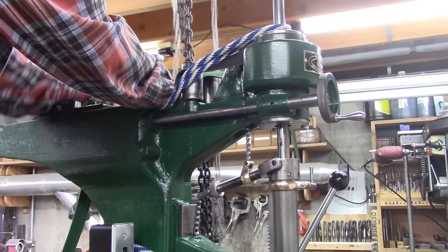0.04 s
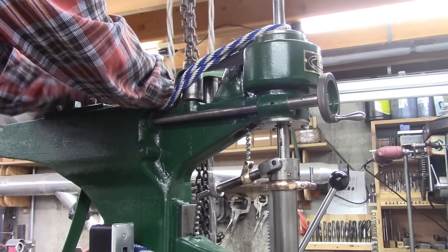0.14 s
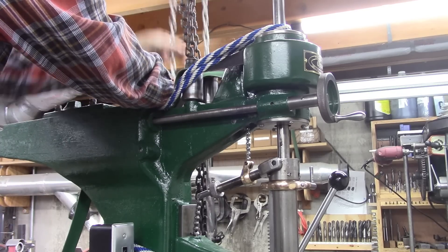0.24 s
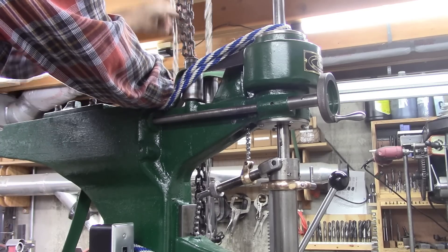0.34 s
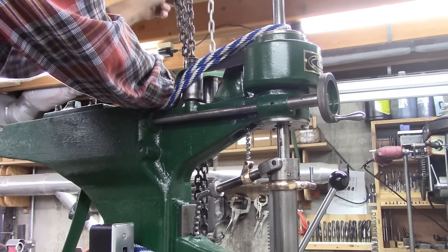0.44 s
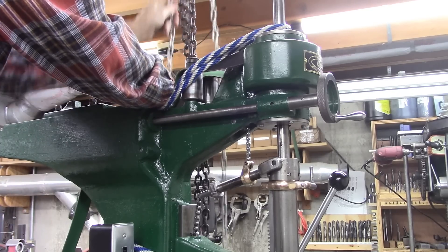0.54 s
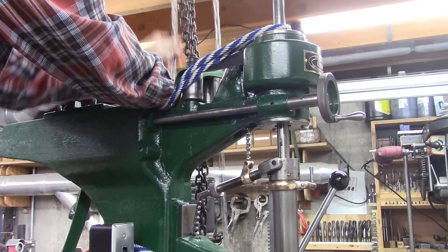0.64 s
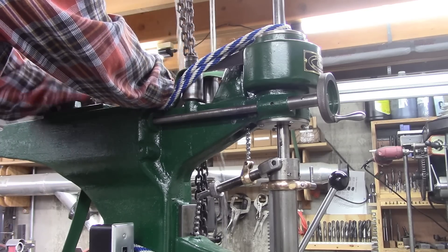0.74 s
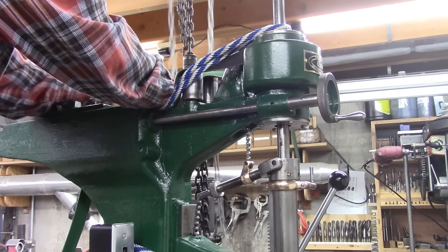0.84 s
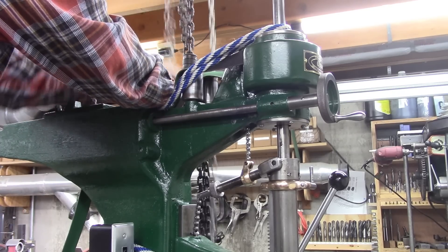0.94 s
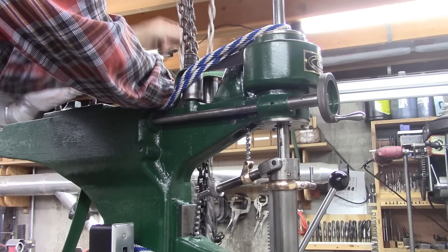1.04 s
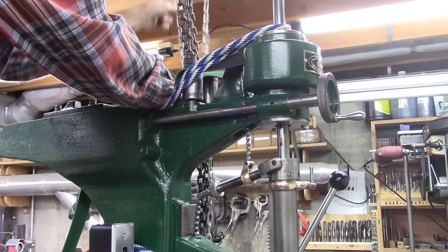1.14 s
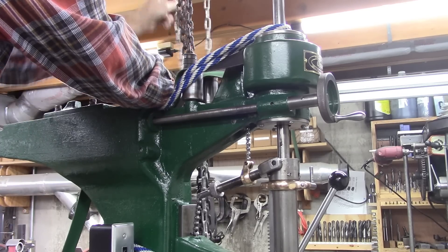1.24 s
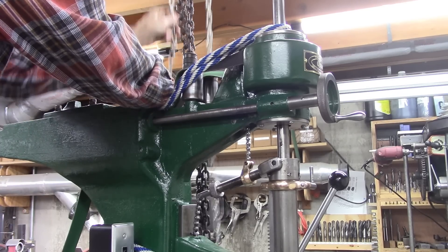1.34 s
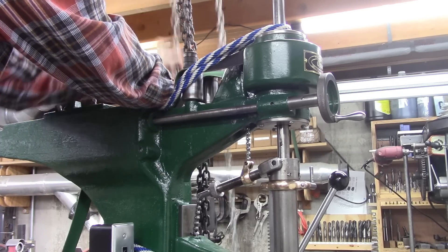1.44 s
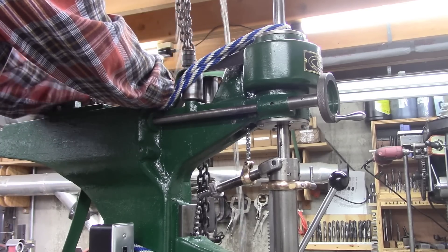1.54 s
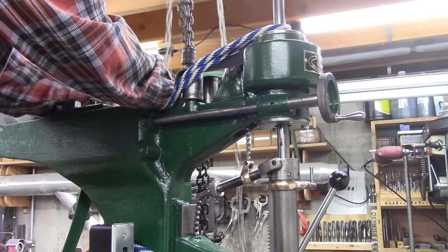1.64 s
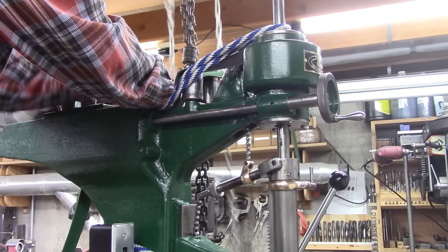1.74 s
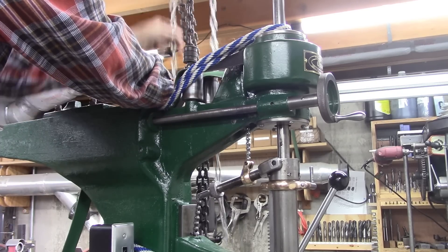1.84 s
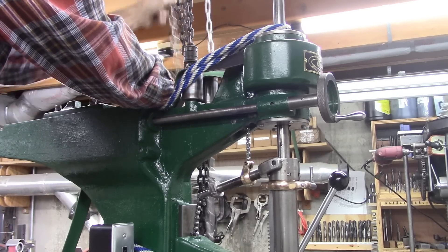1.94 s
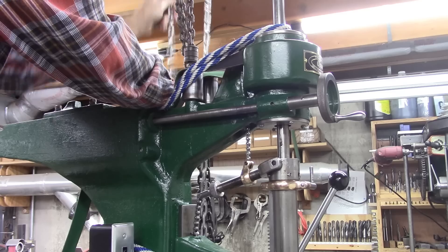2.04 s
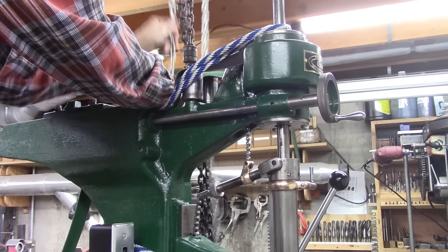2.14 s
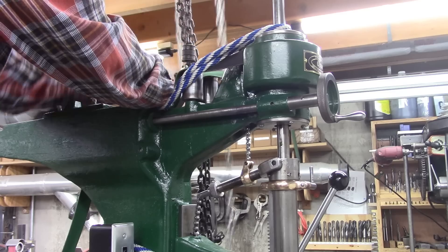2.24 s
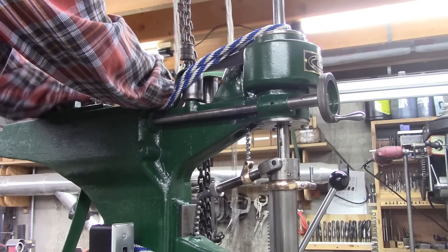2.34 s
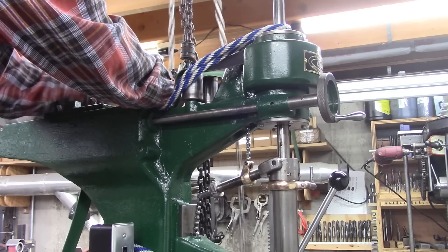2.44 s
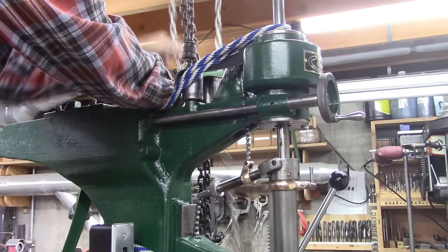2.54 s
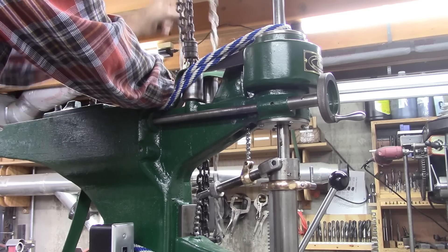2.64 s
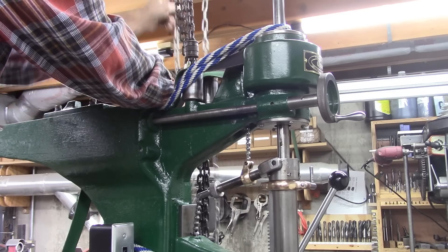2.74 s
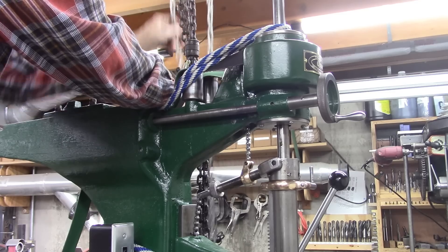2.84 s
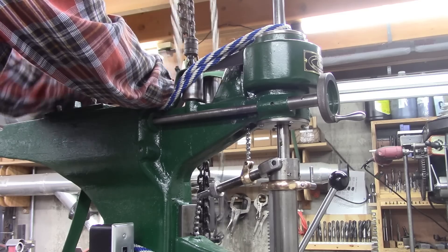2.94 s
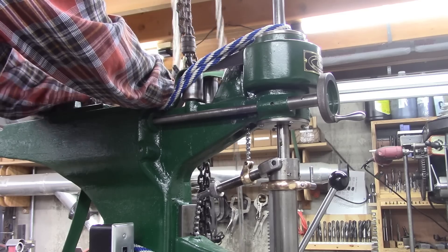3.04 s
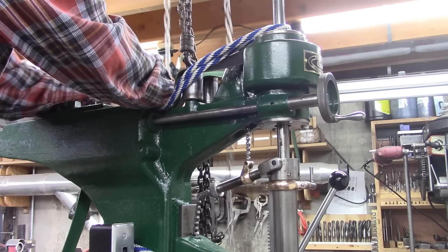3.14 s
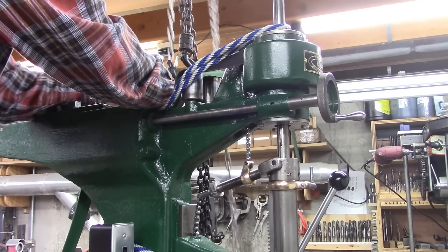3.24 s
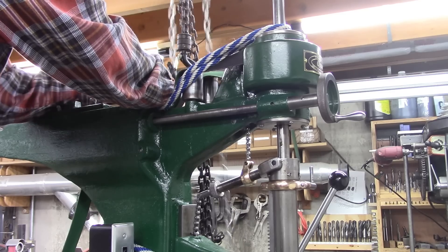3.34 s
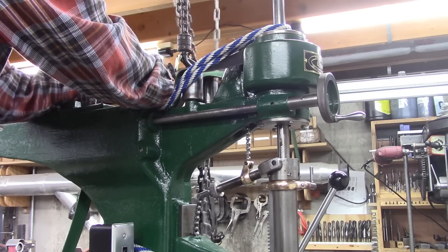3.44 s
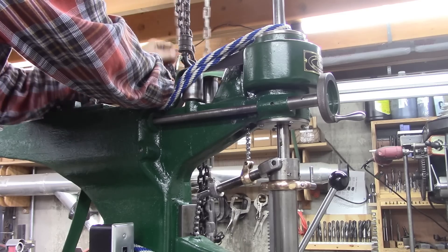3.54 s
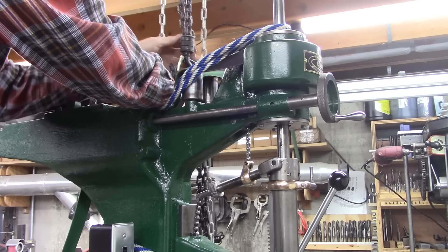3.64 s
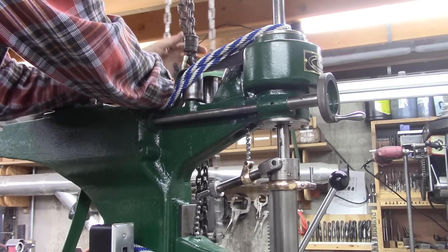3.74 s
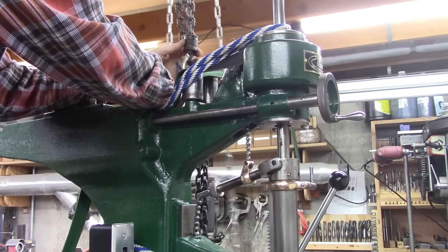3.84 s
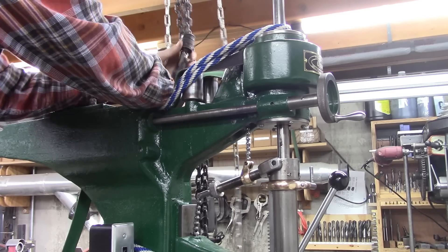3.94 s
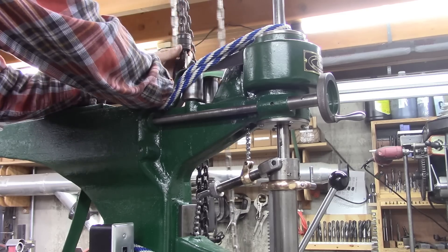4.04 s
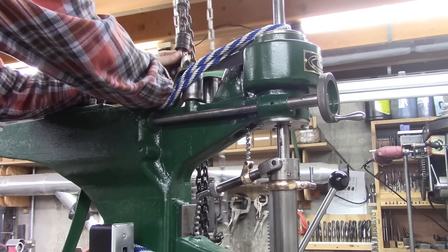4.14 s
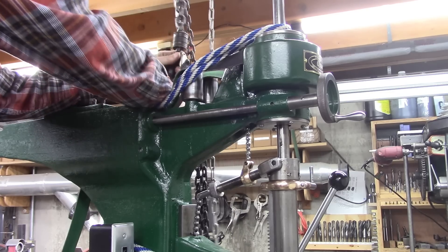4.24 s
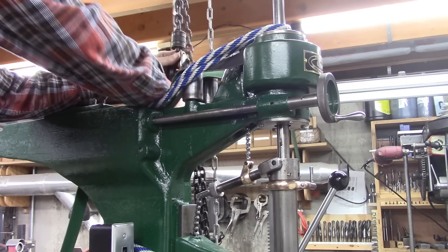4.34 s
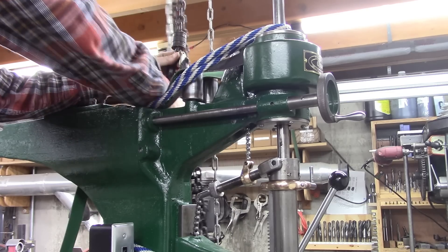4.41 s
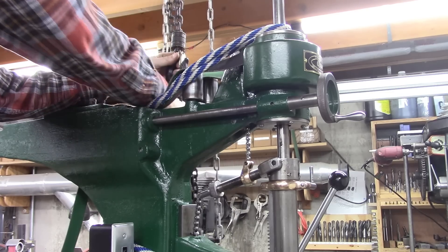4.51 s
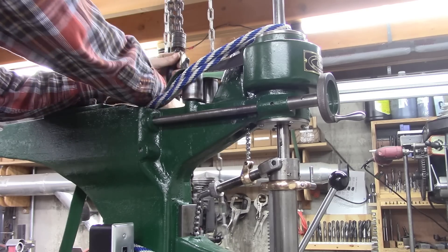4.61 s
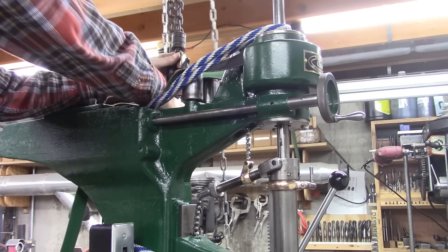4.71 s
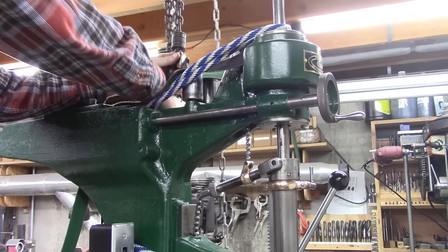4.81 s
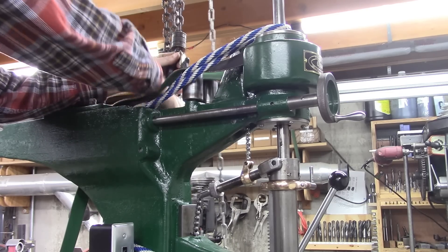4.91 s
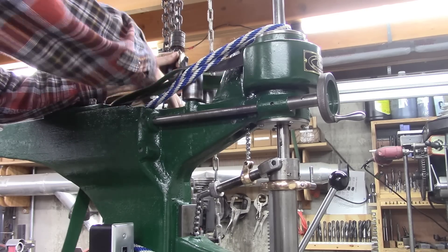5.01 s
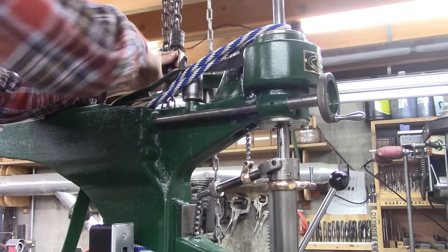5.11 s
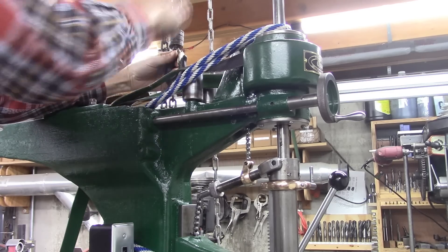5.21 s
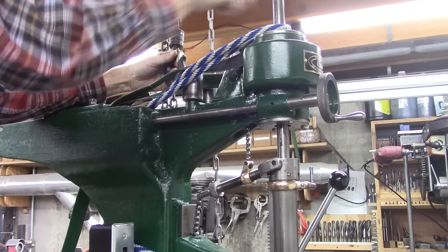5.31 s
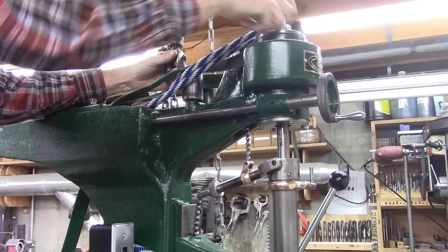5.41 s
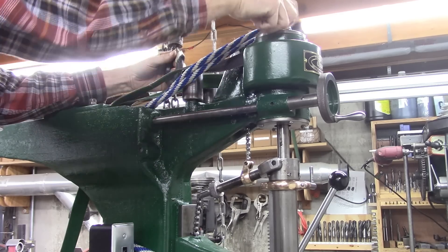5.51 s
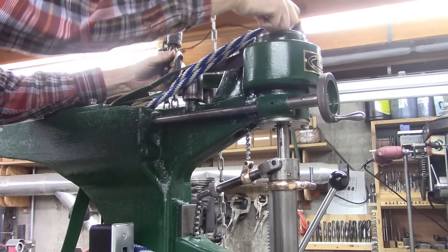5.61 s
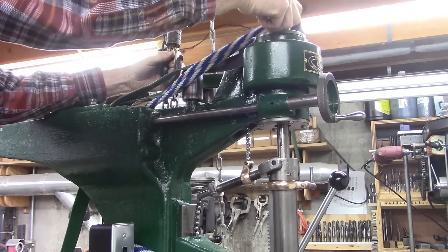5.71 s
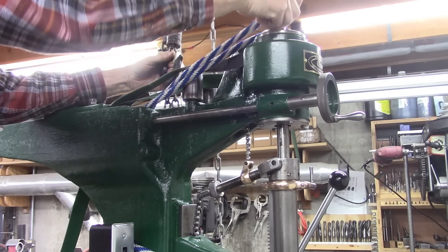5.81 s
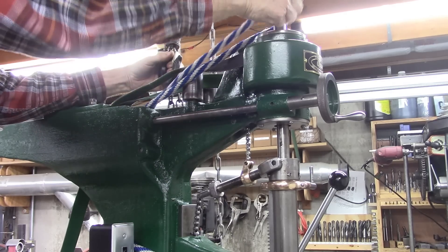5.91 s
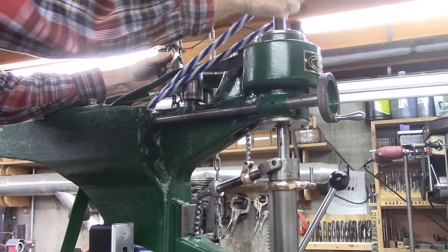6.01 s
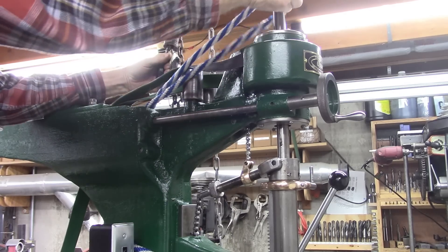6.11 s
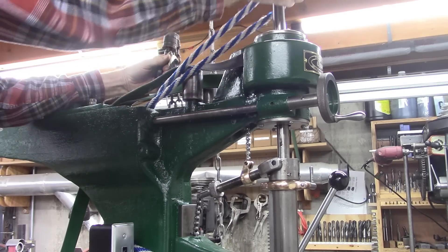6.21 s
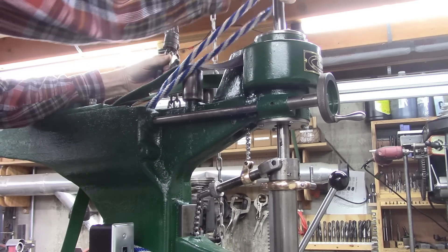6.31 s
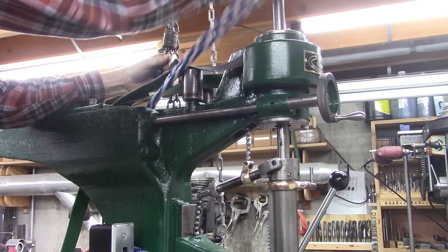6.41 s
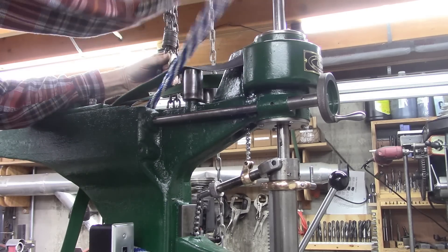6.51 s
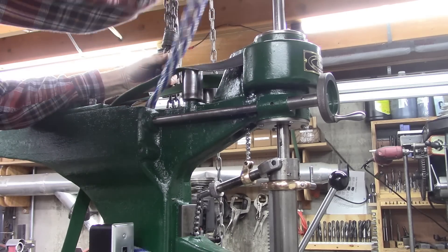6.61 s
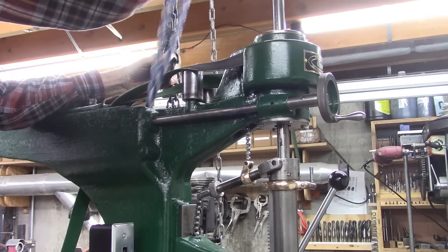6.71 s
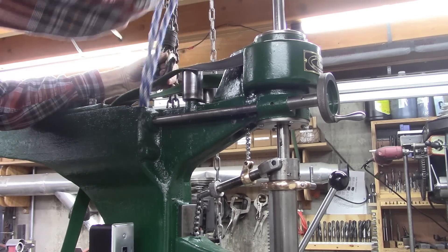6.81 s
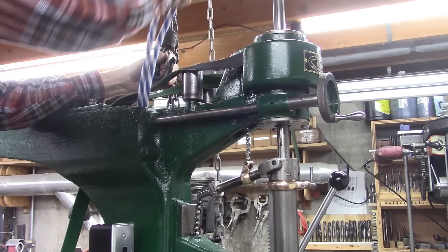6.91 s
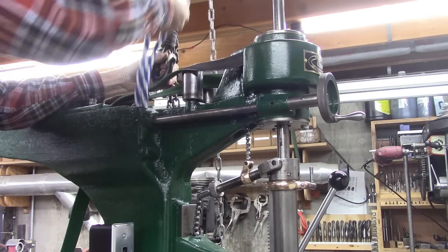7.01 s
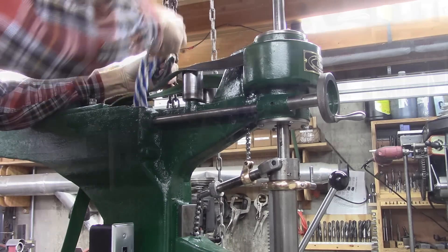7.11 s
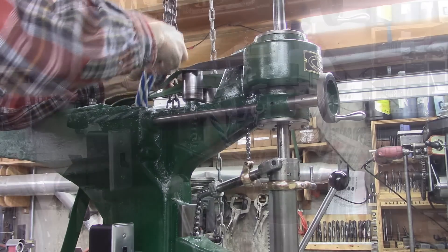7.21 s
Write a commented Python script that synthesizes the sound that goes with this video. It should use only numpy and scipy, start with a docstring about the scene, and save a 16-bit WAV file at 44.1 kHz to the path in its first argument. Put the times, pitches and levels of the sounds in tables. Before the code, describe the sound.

Five brisk bursts of sharp pawl clicking with chain clinking and hollow wheel clanks, nearly back to back, loud and near. A beam shudders low beneath them. Then comes much quieter handling of a heavy slung machine: dull and metallic knocks, tiny high squeaks, sleeves and rope sliding. Short workshop echoes and a faint hum surround everything, and a blurred ratchet rattle rises just before the cut.

```python
"""A fast steel rattle runs down at once: a hand chain hoist is hauled in five pulls, close to the microphone.
The pawl snaps at every tooth, every few teeth a chain link knocks into the wheel and jingles, the chain ticks
through its guide, and now and then the housing booms and the beam shudders.
Then the slung machine is handled with small knocks, squeaks and rubbing, and the rattle swells again at the end.
Filtered noise bursts make the impacts, decaying sines the rings; the workshop adds echoes, air and faint hum."""
import sys
import numpy as np
from scipy import signal
from scipy.io import wavfile
from scipy.ndimage import uniform_filter1d, minimum_filter1d

SR = 44100
rng = np.random.default_rng(int(sys.argv[2]) if len(sys.argv) > 2 else 0)


def store_wav(level_fs):
    """Save 16-bit WAV to argv[1]."""
    pcm = np.round(np.clip(np.atleast_2d(level_fs), -1, 1) * 32767)
    wavfile.write(sys.argv[1], SR, pcm.T.astype(np.int16))


N = 320166
TIME = np.arange(N) / SR  # s

# speed of the ratchet wheel, one curve per pull; the last is the closing rattle: time_s, speed_teeth_per_s
PULLS = [
    [(0.002, 86.7), (0.07, 69.4), (0.153, 54.0), (0.203, 54.6), (0.323, 37.8), (0.35, 27.3), (0.398, 25.6),
     (0.462, 14.6)],
    [(0.556, 18.8), (0.724, 74.1), (0.786, 79.8), (0.96, 44.0), (1.006, 45.0), (1.043, 35.0), (1.105, 27.2),
     (1.184, 4.4)],
    [(1.338, 18.1), (1.48, 58.9), (1.582, 76.5), (1.708, 49.4), (1.747, 49.5), (1.881, 29.4), (1.924, 27.2),
     (1.996, 10.2)],
    [(2.07, 8.1), (2.139, 28.5), (2.194, 55.9), (2.356, 77.8), (2.492, 45.6), (2.549, 51.2), (2.585, 38.3),
     (2.754, 20.9)],
    [(2.808, 16.7), (3.009, 70.9), (3.089, 67.1), (3.171, 44.9), (3.222, 44.8), (3.31, 25.6), (3.364, 27.0),
     (3.431, 15.1)],
    [(7.128, 37), (7.27, 45)],
]
# ring of the chain wheel and its steel cover: pitch_hz, relative_level_db, t60_s
WHEEL_MODES = [(407, -21, .12), (530, -3.5, .04), (590, -2, .04), (738, -2, .07), (779, 1, .08),
               (893, 0, .07), (983, -5, .07), (1090, -11, .06), (1352, -5.5, .085), (1425, -11, .1)]
# sleeves and rope rub over the casting: time_s, level_db
RUBBING = [(3.3, -52), (3.9, -46.5), (4.2, -46), (4.6, -50.5), (5, -52), (5.3, -53), (5.7, -59),
           (6.25, -57.5), (6.43, -50), (6.55, -58), (7, -58), (7.2, -50)]


def amp(db):
    """Decibels to gain."""
    return 10 ** (np.asarray(db) / 20)


def unit(x):
    """Scales to rms 1."""
    return x / np.sqrt(np.mean(x ** 2) + 1e-20)


def read(points, hz):
    """Reads a table on a log-frequency axis."""
    f, value = np.transpose(points)
    return np.interp(np.log(hz + 1), np.log(f + 1), value)


def level(curve):
    """Gain over time from rows of time_s, level_db."""
    return amp(np.interp(TIME, *np.transpose(curve)))


def add(mix, s, sound):
    """Mixes a sound in at time s."""
    part = mix[max(round(s * SR), 0):][:len(sound)]
    part += sound[:len(part)]


def colour(x, points, size=4096):
    """Causal filter with the given spectrum; white noise keeps its power."""
    gain = unit(amp(read(points, abs(np.fft.fftfreq(size, 1 / SR)))))
    # minimum phase puts the energy of the taps at their start
    minimum_phase = np.exp(np.conj(signal.hilbert(np.log(gain))))
    taps = np.fft.ifft(minimum_phase).real
    return signal.oaconvolve(x, taps[:size // 2])[:len(x)]


def chatter(hold, fade):
    """Steel bouncing on steel: a dense noise burst that holds briefly, then dies (both in s)."""
    t = TIME[:SR // 4]
    return rng.standard_normal(len(t)) * np.exp(-np.maximum(t - hold, 0) / fade)


def ring(modes, scatter_db, detune, life=1):
    """One blow on a set of modes, each blow on a different spot; life scales the decay times."""
    hz, db, t60 = np.transpose(modes)[:, :, None]
    t = TIME[:int(SR // 4 * min(life, 1))]
    size = amp(db + scatter_db * rng.standard_normal(hz.shape))
    turns = hz * (1 + detune * rng.standard_normal(hz.shape)) * t + rng.random(hz.shape)
    tones = np.sin((2 * np.pi * turns).astype(np.float32))
    decay = np.exp((-np.log(1000) * t / (life * t60)).astype(np.float32))
    return (size * tones * decay).sum(0) / np.sqrt(np.sum(size ** 2) / 2)


def wavering(hz, width_hz):
    """A tone whose pitch and strength wander at random."""
    f = np.fft.fftfreq(N, 1 / SR)
    band = 1 / (1 + ((f - hz) / width_hz) ** 4)
    z = np.fft.ifft(np.fft.fft(rng.standard_normal(N)) * band)
    return unit(z.real / abs(z) ** .8)  # most of the strength's wandering is evened out


def passings(first_teeth, spacing):
    """Rows (s, teeth per s): the moments at which the wheel has turned on by another `spacing` teeth."""
    rows = []
    for pull, first in zip(PULLS, first_teeth):
        times, speeds = np.transpose(pull)
        t = np.arange(times[0], times[-1], 1 / SR)
        speed = np.interp(t, times, speeds)
        turned = np.cumsum(speed) / SR  # teeth
        at = np.searchsorted(turned, np.arange(first, turned[-1], spacing))
        rows += zip(t[at], speed[at])
    return rows


def pawl_drops(still_db=-4.5, softer_db_per_tooth_per_s=.05, scatter_db=0.64):
    """Rows (s, dB): the pawl drops once a tooth; a fast wheel leaves it less time to fall, so it hits softer."""
    return [(s, still_db - softer_db_per_tooth_per_s * speed + scatter_db * rng.standard_normal())
            for s, speed in passings(np.zeros(len(PULLS)), 1)]


def pawl(snap_db=-1.5, clang_db=-3.0, clang_life=0.17, ring_db=-11.5, rebound_db=-17, hold=0.0036, fade=0.0018):
    """Each drop of the pawl snaps, clangs while it presses on the ratchet, leaves a faint ring and rebounds."""
    # colour of a pawl click: frequency_hz, relative_level_db
    click_colour = [(200, -29), (500, -9), (1100, -11), (1550, -3.5), (2050, -0.5), (2800, 2), (3800, -10),
                    (4700, -4.5), (5600, -1.5), (7600, 1.5), (10000, 1), (12500, -1.5), (15500, -9)]
    # ring of the ratchet wheel: pitch_hz, relative_level_db, t60_s
    ratchet_modes = [(2070, -7, .06), (2460, -6, .08), (2655, -3, .08), (2865, -3, .1), (3130, -6, .07),
                     (3603, -6.5, .14), (4234, -5, .2), (5385, 1, .11), (5900, -3, .1), (6194, -2, .14),
                     (6820, -4, .08), (7590, -1, .08), (8625, -3, .16), (8814, -1, .13), (9443, -.5, .2),
                     (9810, -2, .15), (10050, 0, .08), (10818, -4, .14), (11780, -7, .12), (13300, -7, .06),
                     (14000, -9, .1)]
    snaps, rings = np.zeros((2, N))
    for s, db in pawl_drops():
        add(snaps, s, amp(db + snap_db) * chatter(hold, fade))
        add(snaps, s + rng.uniform(.008, 0.036), amp(db + rebound_db) * chatter(0, 0.00083))
        clang = ring(ratchet_modes, scatter_db=2, detune=.002, life=clang_life)
        add(rings, s, amp(db + clang_db) * clang)
        add(rings, s, amp(db + ring_db) * ring(ratchet_modes, scatter_db=3.5, detune=.0008))
    return colour(snaps, click_colour) + rings


def link_knocks(still_db=-12.5, softer_db_per_tooth_per_s=0.0333, scatter_db=0.87, teeth_per_link=2.58):
    """Rows (s, dB): a link seats every few teeth, more softly at speed; listed slaps of slack chain join in."""
    # turn of the wheel before the first link of each pull seats: turn_teeth
    first_link = [.3, .5, .35, .1, .5, 1.0]
    # the slack chain slaps back on the wheel as the hands change over: start_s, relative_level_db
    slaps = [(.474, -21), (1.14, -21), (1.982, -23), (2.797, -20.5)]
    seated = [(s, still_db - softer_db_per_tooth_per_s * speed + scatter_db * rng.standard_normal())
              for s, speed in passings(first_link, teeth_per_link)]
    return seated + slaps


def chain_wheel(links, ring_db=4.0, clack_db=-5):
    """Links roll into the pockets of the wheel, which answers with a hollow ring."""
    # colour of the dry clack of a link: frequency_hz, relative_level_db
    clack_colour = [(40, -15), (125, -5), (190, -19), (260, -7), (320, -19), (600, -1), (850, 0),
                    (1150, -8), (1400, -6), (2700, -5), (5000, -13), (15000, -22)]
    clacks, rings = np.zeros((2, N))
    seating = 1 - np.exp(-(TIME[:SR // 4] / .002) ** 2)  # rounds off the onset
    for s, db in links:
        add(clacks, s, amp(db + clack_db) * chatter(.004, .0035) * seating)
        blow = ring(WHEEL_MODES, scatter_db=1.5, detune=.005)
        add(rings, s, amp(db + ring_db) * blow * seating)
    return colour(clacks, clack_colour) + rings


def chain_guide(guide_db=-26, ticks_per_tooth=12, full_speed=60):
    """The chain ticks through its guide, denser the faster it runs; guide_db holds at full_speed teeth per s."""
    # colour of the chain sliding through its guide: frequency_hz, relative_level_db
    guide_colour = [(150, -13.5), (270, -7), (450, -18.5), (1000, -15.5), (1350, 1.5), (1550, -8.5),
                    (2070, -1), (2750, 2), (3900, -12), (5400, 2), (15000, -24.5)]
    speed = sum(np.interp(TIME, *np.transpose(pull), left=0, right=0) for pull in PULLS)
    ticks = rng.standard_normal(N) * (rng.random(N) < ticks_per_tooth * speed / SR)
    one_tick = unit(chatter(0, .001)[:SR // 100]) / np.sqrt(SR // 100)  # energy 1
    ticks = signal.oaconvolve(ticks, one_tick)[:N]
    return amp(guide_db) * colour(ticks, guide_colour) * np.sqrt(SR / (ticks_per_tooth * full_speed))


def loose_chain(links, shake_db=-7):
    """The hanging loop clinks on its own and just after each link knock."""
    # loose links clink together: start_s, level_db
    clinks = [(0.524, -13), (1.093, -11.5), (1.312, -33), (1.321, -22), (1.914, -25), (2.692, -10),
              (2.817, -12.5), (3.351, -14), (3.695, -37)]
    # ring of loose links: pitch_hz, relative_level_db, t60_s
    chain_modes = [(5280, -5, .03), (5390, 0, .045), (6190, -10, .04), (7500, -12, .03)]
    out = np.zeros(N)
    shaken = [(s + rng.uniform(0, .04), db + shake_db + rng.uniform(-3, 3)) for s, db in links]
    for s, db in clinks + shaken:
        add(out, s, amp(db) * ring(chain_modes, scatter_db=2, detune=.006))
    return out


def housing(boom_db=3, scrape_db=-5, rise=0.0082):
    """The chain scrapes over the housing, whose low ring builds up and dies."""
    # the chain drags on the housing and sets it booming: start_s, relative_level_db
    drags = [(0, -29.5), (0.851, -25), (1.129, -17), (1.675, -26.5), (1.875, -34.5), (2.373, -30),
             (2.96, -25), (3.01, -24.5), (3.165, -19.5), (3.39, -39), (3.569, -39.5)]
    # ring of the housing: pitch_hz, relative_level_db, t60_s
    housing_modes = [(235, -17, .1), (270, -11, .12), (360, -16, .1), (407, 0, .18), (470, -13, .08),
                     (530, -4, .1), (610, -7, .08), (760, -7, .08)]
    booms, scrapes = np.zeros((2, N))
    for s, db in drags:
        boom = ring(housing_modes, scatter_db=1, detune=.004)
        build = 1 - np.exp(-(TIME[:len(boom)] / rise) ** 2)
        add(booms, s, amp(db + boom_db) * boom * build)
        add(scrapes, s, amp(db + scrape_db) * chatter(0.026, 0.0043) * build)
    return booms + colour(scrapes, [(60, -16), (300, -10.0), (410, 6), (700, 0.5), (1500, -8), (15000, -53)])


def last_pull(x, blur=0.014, blur_db=0.0, ring_db=-14, slide_db=-5):
    """The closing rattle sounds farther off: its clicks blur, the wheel sings and the chain slides."""
    scatter = chatter(0, blur)
    blurred = amp(blur_db) * signal.fftconvolve(x, scatter / np.linalg.norm(scatter))[:N]
    strength = np.sqrt(abs(uniform_filter1d(blurred ** 2, size=700)))
    slide = colour(rng.standard_normal(N), [(200, -33), (1300, 0), (4000, -1), (7500, 1), (15000, -32)])
    sing = wavering(hz=945, width_hz=50)
    return blurred + strength * (amp(ring_db) * sing + amp(slide_db) * slide)


def handling(body_db=-5.0, edge_db=-1, wheel_db=-4, squeak_db=-1):
    """Knocks that also ring the hoist's wheel, and stick-slip squeaks, as the load is steadied."""
    # knocks of the slung machine and its tackle:
    # start_s, relative_body_level_db, relative_edge_level_db, edge_pitch_hz, fade_s
    knocks = [(1.261, -26.5, -23.5, 2520, 0.003), (3.555, -40, -32.5, 3540, 0.013),
              (3.62, -47, -38.5, 3900, 0.013), (3.69, -36.5, -37, 4170, 0.033),
              (3.819, -34, -38, 3020, 0.0035), (3.858, -35, -41, 2820, 0.029),
              (3.938, -37, -41, 3520, .004), (4.195, -57, -37.5, 2280, 0.0011),
              (4.372, -37, -36, 1600, 0.031), (4.455, -40, -60, 1500, .04), (4.638, -39.5, -39, 3900, 0.01),
              (4.835, -35.5, -30.5, 5000, 0.0055), (4.92, -52, -45.5, 5600, 0.014),
              (5.038, -43.5, -47, 2800, 0.022), (5.065, -59, -41.5, 5200, 0.0062),
              (5.095, -52, -60, 3000, .003), (5.205, -50, -52, 1400, .02),
              (5.942, -54, -38.5, 6070, 0.0078), (6.175, -54, -52, 2200, 0.011)]
    # colour of a knock's body: frequency_hz, relative_level_db
    body_colour = [(100, -46), (350, -2.5), (580, 14.5), (900, 1), (1150, 5), (1450, 3.5), (2500, -15),
                   (5000, -39), (15000, -54)]
    # thin squeaks of the tackle under load: start_s, length_s, relative_level_db
    squeak_rows = [(.95, .13, -30), (1.17, .18, -38), (3.57, .2, -48), (3.835, .04, -46), (3.895, .07, -48),
                   (4.445, .065, -42), (4.593, .035, -36.5), (4.755, .025, -48), (4.96, .12, -57)]
    # ring of a squeak: pitch_hz, relative_level_db, t60_s
    squeak_modes = [(14680, 0, .04), (14950, -4, .02), (15220, -2, .03), (15500, -3, .04)]
    body, edge, wheel, squeaks = np.zeros((4, N))
    for s, low_db, high_db, hz, fade in knocks:
        add(body, s, amp(low_db) * chatter(.0015, fade))
        add(wheel, s, amp(low_db) * ring(WHEEL_MODES, scatter_db=2, detune=.004, life=2.5))
        metal = [(hz / 4, -20), (hz / 1.4, -3), (hz, 0), (hz * 1.4, -3), (hz * 2, -13), (hz * 5, -27)]
        add(edge, s, amp(high_db) * colour(chatter(.0015, fade), metal))
    for s, length, db in squeak_rows:
        count = int(length * SR)
        slips = rng.standard_normal(count) * signal.windows.tukey(count, .4)
        squeak = signal.fftconvolve(slips, ring(squeak_modes, scatter_db=2, detune=.003))
        add(squeaks, s, amp(db) * squeak / squeak[:count].std())
    knocking = amp(body_db) * colour(body, body_colour) + amp(edge_db) * edge + amp(wheel_db) * wheel
    return knocking + amp(squeak_db) * squeaks


def beam(hauling_db=-46.0, leaning_db=-10, rumble_db=-10, settle_s=0.12, jolt_fade_s=0.075):
    """The beam trembles low in the five pulls and while the load is handled, and shudders at each jolt."""
    # the load jolts the beam that carries the hoist: peak_s, level_db, build_up_s
    jolts = [(.46, -38, 0.043), (.8, -36, 0.04), (1.15, -27, .06), (1.52, -36, .03), (2.0, -29, 0.14),
             (2.73, -36.5, 0.031), (3.08, -36, .15), (4.17, -42, .02)]
    turning = sum((TIME > pull[0][0]) & (TIME < pull[-1][0]) for pull in PULLS[:-1])
    stopped_s = TIME - np.maximum.accumulate(TIME * turning)
    hauling = amp(hauling_db) * np.exp(-stopped_s / settle_s)
    power = hauling ** 2 + (amp(leaning_db) * level(RUBBING)) ** 2
    for s, db, build in jolts:
        power += (amp(db) * np.exp(-abs(TIME - s) / np.where(TIME < s, build, jolt_fade_s))) ** 2
    shudder = wavering(hz=67, width_hz=4)
    rumble = wavering(hz=52, width_hz=12)
    return np.sqrt(power) * (shudder + amp(rumble_db) * rumble)


def rubbing():
    """Cloth and rope slide in uneven little catches: noise whose level wanders."""
    # colour of the rubbing: frequency_hz, relative_level_db
    rub_colour = [(40, -1), (120, 1.5), (300, 0.5), (500, -2), (800, 1), (1200, -8.5), (2500, -18),
                  (6000, -17), (15000, -19.5)]
    catches = amp(1.5 * unit(uniform_filter1d(rng.standard_normal(N), size=900)))
    return level(RUBBING) * unit(colour(catches * rng.standard_normal(N), rub_colour))


def background(air_db=-51.5):
    """Steady workshop air, as coloured noise, with a faint hum."""
    # colour of the air: frequency_hz, relative_level_db
    air_colour = [(15, -18), (25, 6), (64, -6), (91, -2.5), (178, -2.5), (209, -7.5), (246, 2),
                  (389, -17.5), (433, -2), (567, -10), (1800, -11.5), (5430, -13), (15500, -16.5)]
    # mains hum: pitch_hz, level_db
    hum_tones = [(119, -67), (242, -66.5), (360.7, -70.5)]
    hum = sum(amp(db) * wavering(hz, width_hz=1.0) for hz, db in hum_tones)
    return amp(air_db) * colour(rng.standard_normal(N), air_colour) + hum


def workshop(x, wet_db=-5, near_db=-8, near_t60=0.027, count=9):
    """Quick reflections, then the room's tail; random echo patterns take turns for a smoother tail."""
    # decay of the room: frequency_hz, t60_s
    room_t60 = [(100, .45), (800, .5), (2000, .38), (5500, .32), (10000, .29), (15000, .24)]
    t, out = TIME[:SR], x.copy()
    turn = TIME / .021  # the next echo pattern every 21 ms, crossfaded
    for k in range(count):
        near, far = rng.standard_normal((2, SR)) * (rng.random((2, SR)) < 4000 / SR)  # sparse echoes
        near *= (t > .004) * amp(-60 * t / near_t60)
        hz, frame_s, z = signal.stft(far * (t > .012), SR, nperseg=256)
        decay = amp(-60 * frame_s / read(room_t60, hz)[:, None])
        tail = signal.istft(z * decay, SR, nperseg=256)[1][:SR]
        echoes = amp(near_db) * near / np.linalg.norm(near) + amp(wet_db) * tail / np.linalg.norm(tail)
        share = np.sin(np.pi / 2 * np.minimum((turn - k) % count, 2))  # the squares sum to one
        out += signal.fftconvolve((x * share).astype(np.float32), echoes[:SR // 2].astype(np.float32))[:N]
    return out


def scene(swell_start_s=7.105, swell_per_s=0.98):
    """The hoist and the handling in the room, over its steady background; the closing pull swells in."""
    links = link_knocks()
    hoist = pawl() + chain_wheel(links) + chain_guide() + loose_chain(links) + housing()
    swell = swell_per_s * np.maximum(TIME - swell_start_s, 0)  # gain, rising from silence
    near = hoist * (TIME < swell_start_s)
    in_room = workshop(near + last_pull(hoist * swell) + handling())
    return (in_room + beam() + rubbing() + background())[None]


def record(dry, ceiling_db=0.0, recover_db_per_s=900, edge_hz=15800):
    """A fast limiter turns peaks down to the ceiling; then a low-pass cuts the top of the band."""
    over_db = np.maximum(20 * np.log10(abs(dry[0]) + 1e-9) - ceiling_db, 0)
    fall = TIME * recover_db_per_s
    held_db = np.maximum.accumulate(over_db + fall) - fall
    # a sliding maximum, then a smoothing, ducks slightly ahead of each peak
    duck_db = uniform_filter1d(-minimum_filter1d(-held_db, size=25), size=25)
    low_pass = signal.firwin(511, edge_hz, window=("kaiser", 8), fs=SR)[None]
    return signal.oaconvolve(dry * amp(-duck_db), low_pass, "same")


dry = scene()
out = record(dry)
store_wav(out)
```